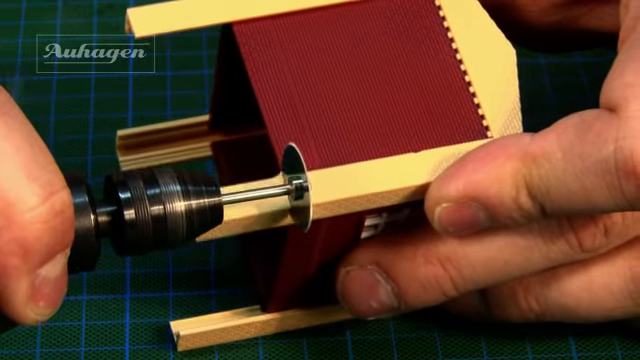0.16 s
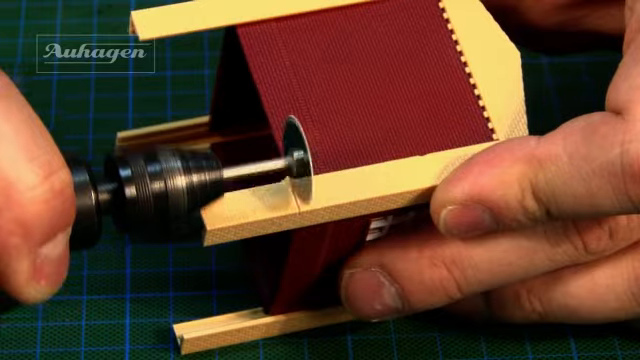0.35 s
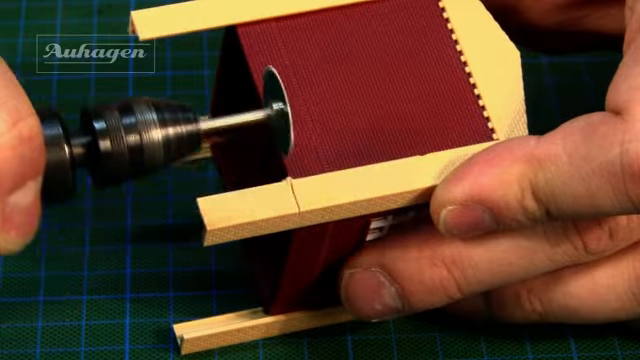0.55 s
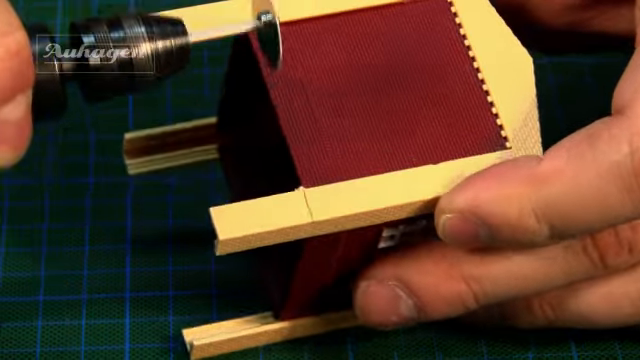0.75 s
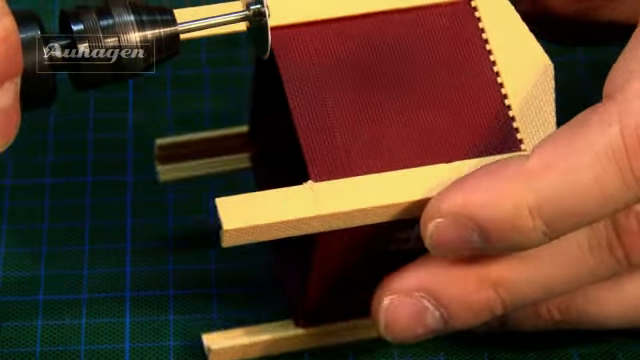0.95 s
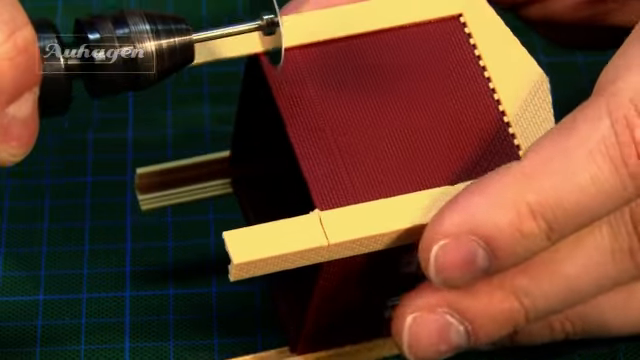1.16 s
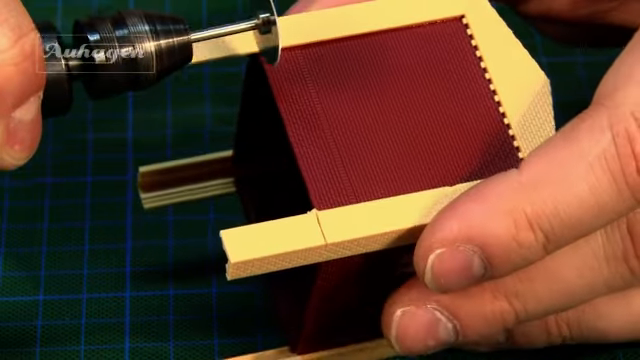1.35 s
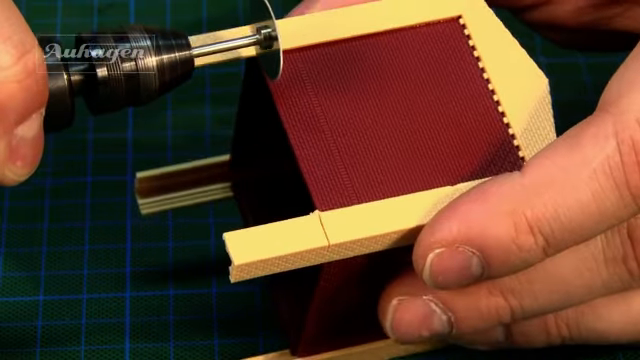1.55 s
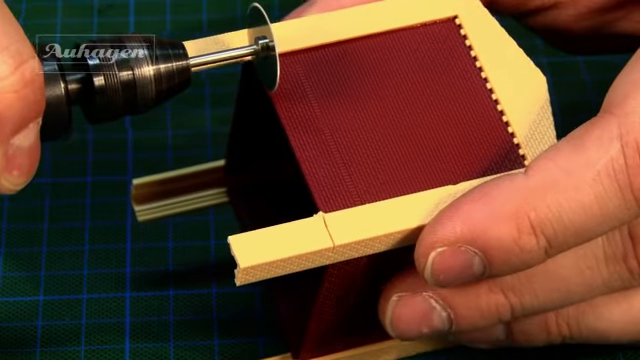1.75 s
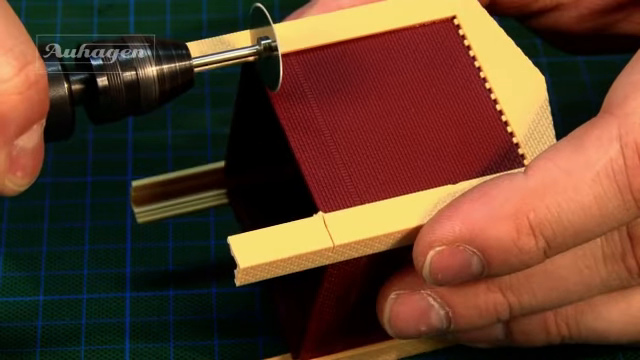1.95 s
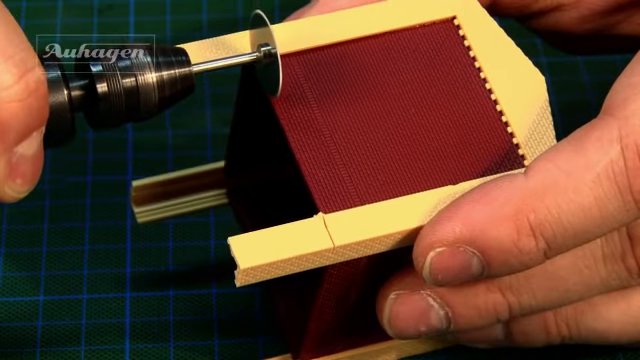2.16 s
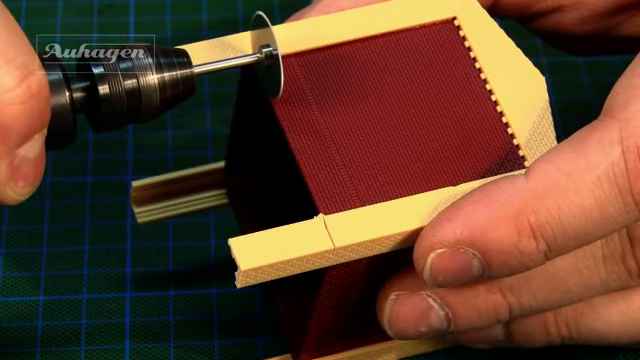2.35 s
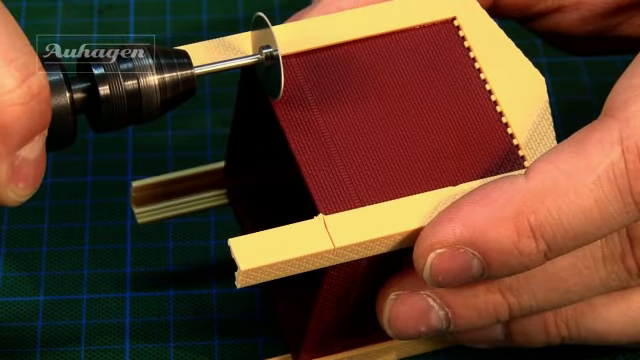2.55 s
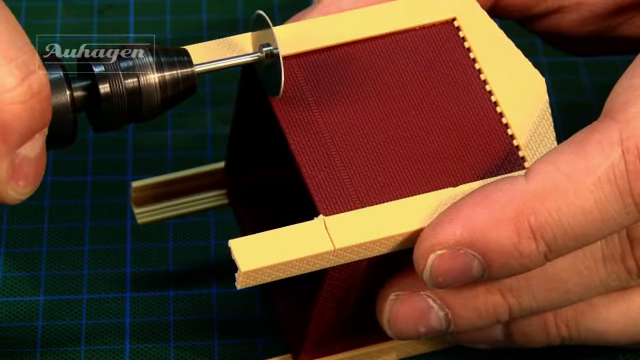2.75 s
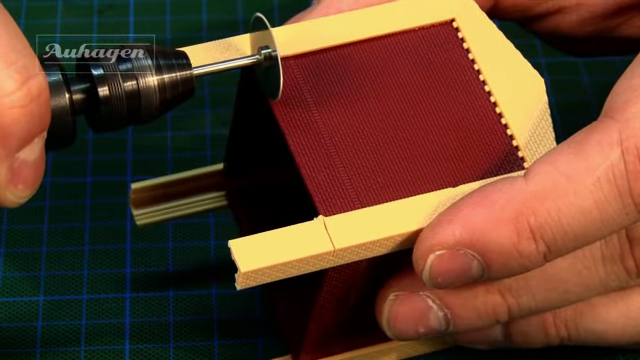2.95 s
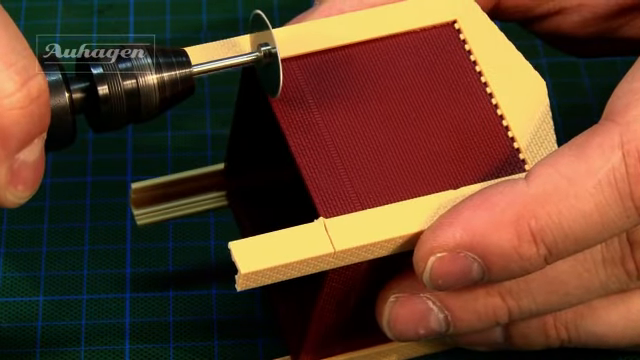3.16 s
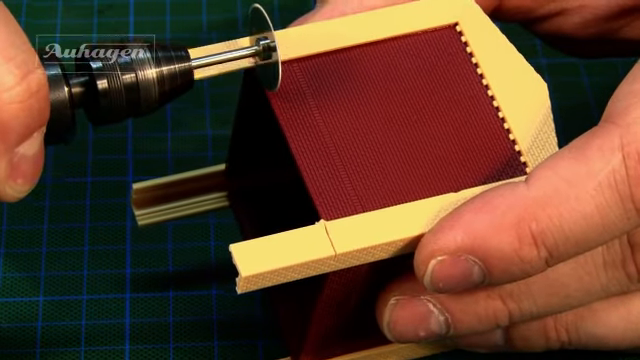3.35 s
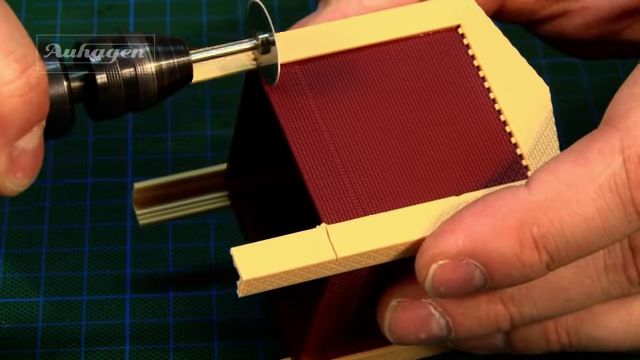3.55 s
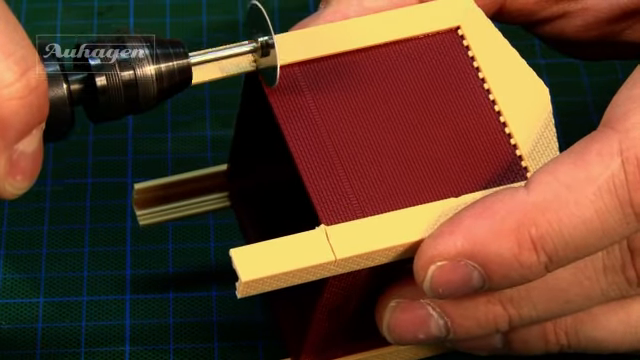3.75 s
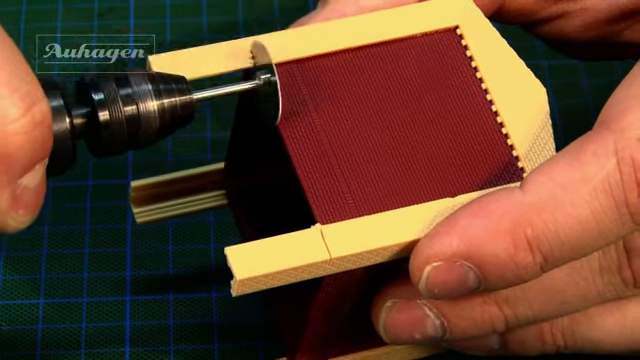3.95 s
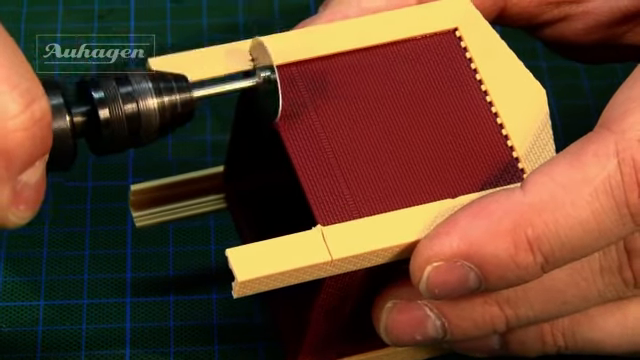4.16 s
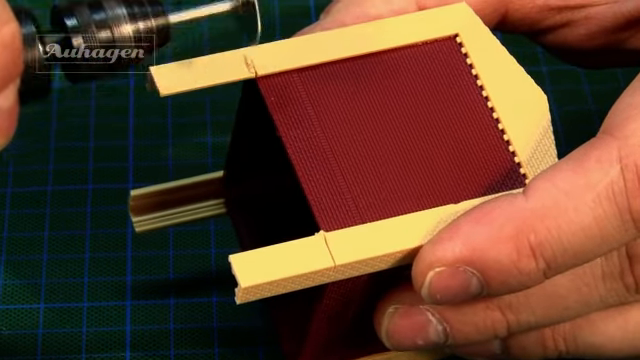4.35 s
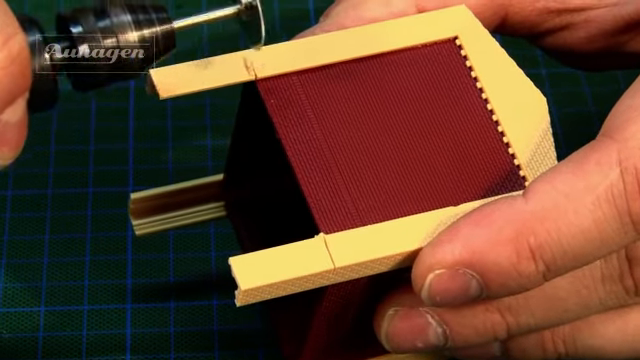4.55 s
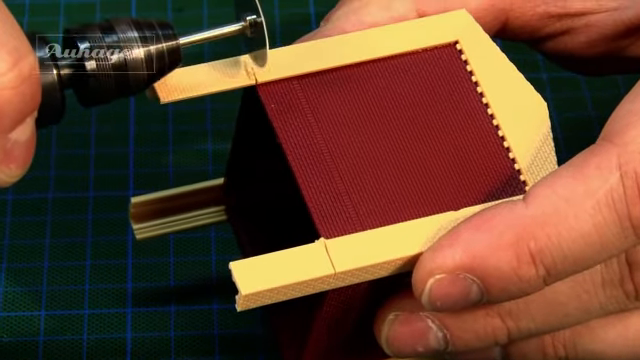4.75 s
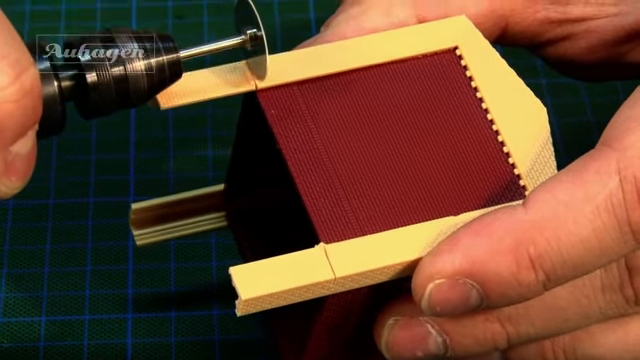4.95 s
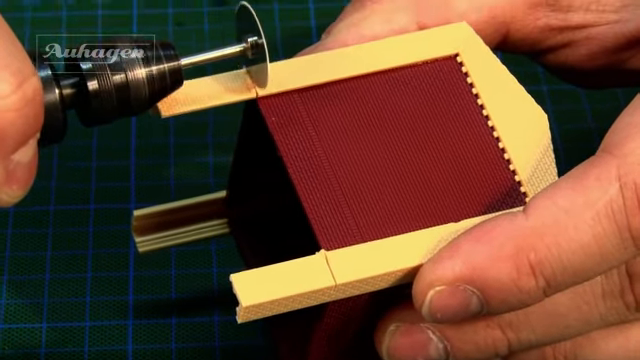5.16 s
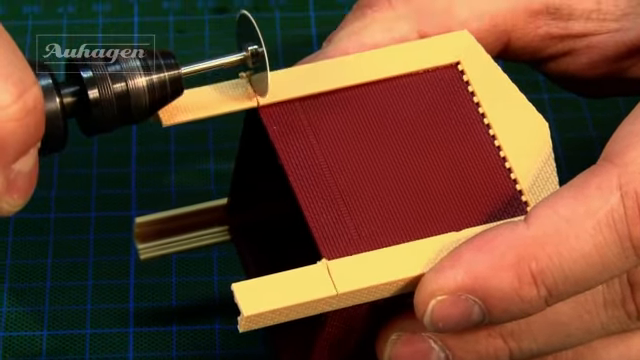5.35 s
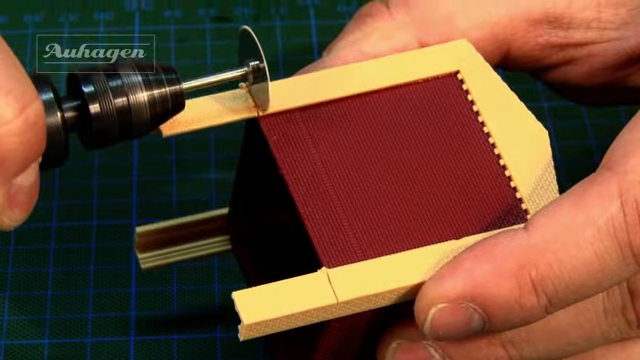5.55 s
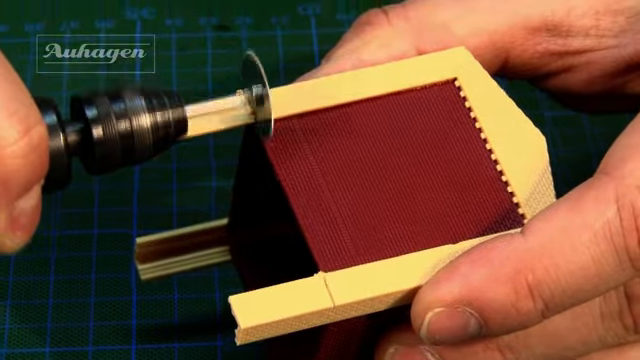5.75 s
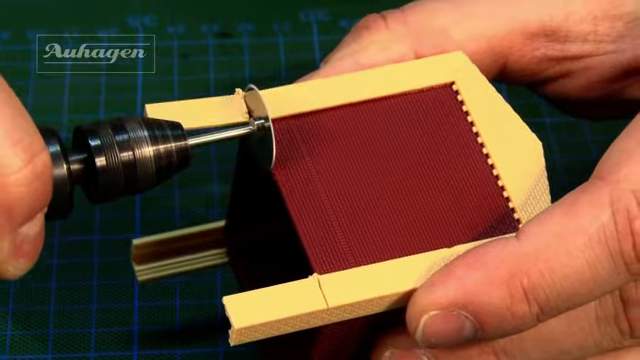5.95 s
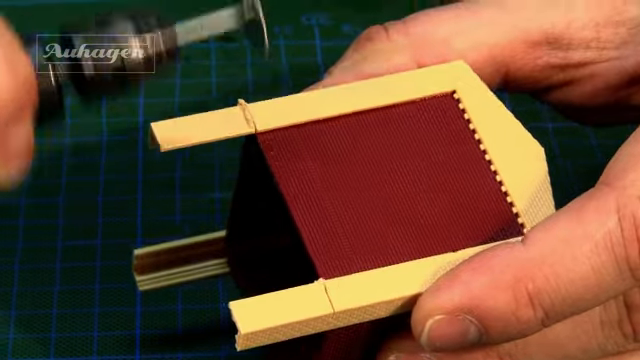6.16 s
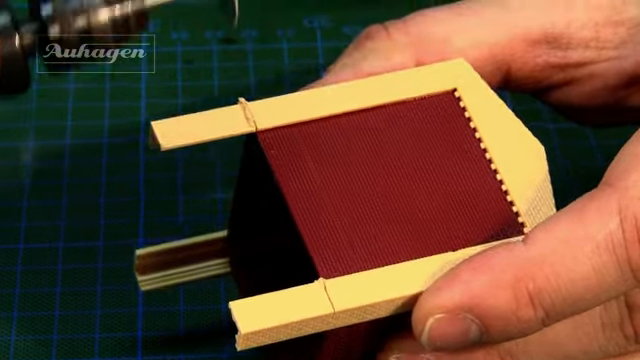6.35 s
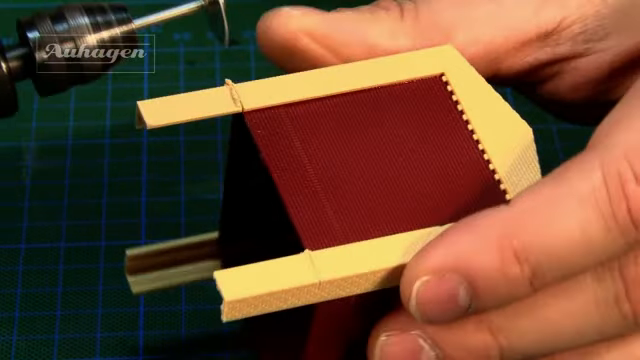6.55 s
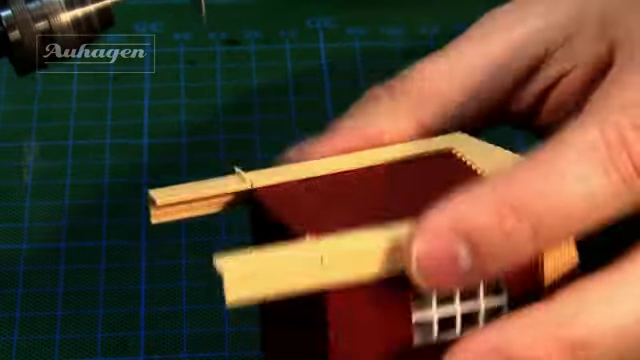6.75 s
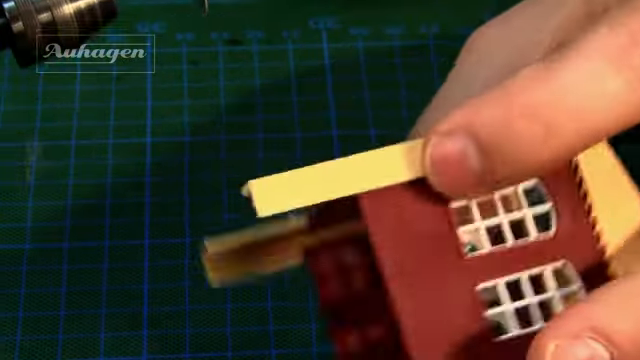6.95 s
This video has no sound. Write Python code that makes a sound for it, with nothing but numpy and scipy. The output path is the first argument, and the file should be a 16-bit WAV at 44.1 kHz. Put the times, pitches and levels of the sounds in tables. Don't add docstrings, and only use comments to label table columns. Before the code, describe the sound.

Close to the microphone in a small quiet room, a slowed cutting disc chatters on the edge of hollow plastic, then slips free and whines steadily. It saws in, buzzing and rasping as the pitch sags, jams with loud snags and squeals, and spins up again. A second cut binds into a clear thin whistle. The whine returns, and plastic taps the bench at the end.

```python
import sys
import numpy as np
from scipy import signal
from scipy.fft import rfft, irfft, next_fast_len
from scipy.io import wavfile
from scipy.ndimage import map_coordinates

SR = 44100
rng = np.random.default_rng(int(sys.argv[2]) if len(sys.argv) > 2 else 0)


def magnitude_from_level(level_db):
    exponent = np.asarray(level_db, float) / 20
    return 10 ** exponent


def unload_audio(sound):
    columns = np.transpose(np.atleast_2d(sound))
    steps = np.round(np.clip(columns, -1, 1) * 32767)
    wavfile.write(sys.argv[1], SR, steps.astype(np.int16))


N = 312669

# start_s, turns_hz
IDLE = [
    (1.05, 112.8),
    (1.5, 111.7),
    (2.35, 110.6),
    (4.9, 112.7),
    (6.5, 113.3),
    (7.09, 113),
]
SPIN_UP_S = .125
BALLS_PER_TURN, RIPPLE_HZ, TEETH = 8.3, 50.5, 59.6

# start_s, turns_hz, grip_db on the box, pressure_db of the rim
BOUNCING = [(0, 54.7, -59, -42), (.1, 55, -60, -41.5), (.16, 49.9, -64, -47.5), (.27, 46.6, -67, -61),
            (.29, 46.3, -71, -69), (.35, 50.5, -63.5, -52), (.4, 61, -74, -59)]
SLIDING_OUT = [
    (.42, 66.6, -72, -47.5),
    (.444, 73.6, -64, -42),
    (.48, 84, -77, -68),
]
SKIMMING = [
    (2.35, 110.7, -80, -84),
    (2.62, 111.1, -79.5, -53),
    (2.75, 108.7, -75, -47),
]
FIRST_SAWING = [(2.8, 109.3, -65.5, -42.5), (2.95, 107.4, -60.5, -40), (3.1, 104.2, -57, -37.5),
                (3.22, 101.3, -57, -41), (3.32, 98.5, -59, -40.5), (3.43, 98.7, -57, -42.5),
                (3.55, 94.54, -57, -41), (3.78, 91.97, -57, -41), (3.85, 86.6, -61, -40)]
FIRST_BINDING = [(3.9, 79.6, -45, -38), (3.94, 76.2, -50, -33.5), (3.952, 74.53, -52, -44),
                 (3.98, 73.24, -49, -36), (4.05, 67.74, -47, -36), (4.16, 61.48, -51.5, -41),
                 (4.23, 58.9, -45.5, -32.5), (4.275, 61.2, -39.5, -38), (4.33, 74.9, -69, -59)]
SECOND_SAWING = [(4.93, 112.3, -92, -64), (4.966, 111.8, -64.5, -54), (5.056, 106.1, -56.5, -46),
                 (5.17, 107.9, -54.5, -48), (5.28, 103.1, -57.5, -50.5), (5.35, 96.17, -59, -44),
                 (5.47, 94.43, -57.5, -45.5), (5.68, 82.65, -59, -43.5), (5.77, 79.27, -60.5, -43.5)]
SECOND_BINDING = [(5.846, 68.53, -49.5, -34.5), (5.894, 63.58, -49.5, -49.5), (5.922, 60.4, -47.5, -39),
                  (5.99, 57, -50, -45.5), (6.14, 52.66, -53.5, -57), (6.158, 53.28, -46.5, -44),
                  (6.175, 56.3, -45, -41.5), (6.2, 62.5, -61, -72)]
# thump_db over grip, tooth_db over pressure, bite sharpness, extra sharpness per dB of lighter touch
BOUNCE, SAW, BIND = (-3, -7, 1, 0), (2.5, -5, 0.7, 0.07), (-15, -8, 0.5, 0.08)
SLIDE = (-8, -22, .2, 0)
FIRM_DB = -38.5
FULL_LOAD_HZ = 28

# multiple, level_db, casing face (0 front, 1 and 2 sides)
WHINE = [(2, -65.5, 0), (3, -58, 0), (4, -55, 0), (5, -58, 1), (6, -55, 2), (7, -54.5, 1), (8, -55.5, 1),
         (9, -52, 1), (10, -59, 0), (11, -68, 0), (12, -62, 1), (13, -62, 0), (14, -65.5, 2),
         (15, -68.5, 2), (16, -76, 2)]
# pitch_hz, width_hz, level_db
CASING = [(2500, 490, 8), (3280, 200, 6), (4200, 430, 6), (5200, 280, 8), (6000, 250, 7), (6980, 190, 12),
          (8450, 400, 18), (11200, 400, 6)]
OFF_PEAK_DB = -1.5
# time_s, nearness_db, turned_db (side face towards the listener)
HAND = [(.45, -3.5, 5), (.62, -2, 0.5), (.8, 5.5, 0.5), (1.05, 1.5, 2.5), (1.25, -3, 3), (1.55, -2.5, 1.5),
        (1.85, 0, -3), (2.3, -0.5, -2), (2.7, 2, -5), (3.2, 2, -1), (3.8, -2, -3.5), (4.4, -2.5, 1),
        (4.9, -2.5, -2.5), (5.3, 1.5, -4.5), (5.75, 4.5, -3.5), (6.4, -1.5, -0.5), (6.8, -0.8, 8),
        (7.09, -1, 5.5)]
FRONT_DB, FRONT_FOLLOWS, FRONT_TURNS = -0.6, 0.3, -0.063
# multiple, start_s, end_s, gain_db
FINGERS = [(5, 0.84, 1.7, -2.5), (2, 1.06, 1.3, 3.5), (12, .75, 1.55, 3.5), (9, 1.2, 1.6, 3.5),
           (8, 1.2, 1.84, -2), (7, 1.14, 1.6, -1.5), (14, 1.8, 2.8, -6), (4, 1.92, 2.17, 4.5),
           (3, 2, 2.1, 3), (11, 1.8, 2.5, 4), (13, .75, 1.5, 3), (14, 4.6, 6.2, -8), (8, 6.65, 7.2, -5.5),
           (6, 6.5, 7.2, -6), (5, 6.8, 7.0, 3.5), (12, 6.5, 7.0, -5), (10, 6.6, 7.2, -4),
           (15, .75, 1.25, 2.5)]
FINGER_RAMP_S = 0.087
STALL_HZ, STALL_RANGE_HZ, STALL_DB, STALL_TOP_OVERTONE = 106, 36, -12, 13
# pitch_hz, level_db per Hz
BRUSH_HISS = [(710, -53), (1200, -28), (1680, -53), (2150, -7.5), (2560, -9.5), (2790, -4), (4130, -5),
              (7000, -4), (8800, -8.5), (14400, -22.5), (15300, -16), (16000, -62)]
HISS_DB, HISS_FOLLOWS, LOAD_HISS_DB = -51.5, 0.19, 10

# pitch_hz, width_hz, level_db
HOLLOW = [(405.6, 86, 5.5), (618, 185, -1)]
# pitch_hz, width_hz, level_db
WALLS = [(1248, 34, 11), (840, 340, -3), (1540, 200, -4.5), (2180, 400, -21), (2900, 110, 0.5)]
# pitch_hz, width_hz, level_db
SCRAPE = [(1330, 290, -21), (2196, 470, -3), (2947, 130, -1), (4000, 760, -2.5), (5590, 1050, -1),
          (8400, 2260, -5.5)]
# start_s, end_s, gain_db
SINGING = [(2.75, 3.1, -3), (4.97, 5.19, -1), (5.331, 5.47, -5), (3.3, 3.461, 1), (3.502, 3.8, -1.5),
           (3.871, 3.952, 3), (4.016, 4.1, 4), (5.19, 5.324, 6.5), (5.481, 5.583, 4.5), (5.63, 5.79, -3),
           (5.791, 5.884, 5.5)]
SING_RAMP_S = 0.021

# start_s, end_s, pitch_hz, width_hz, level_db
CHATTER = [
    (3.868, 3.94, 2340, 169, -42.5),
    (3.964, 4.0, 2310, 200, -46),
]
RASP = [(.004, .175, 3080, 100, -50), (2.76, 2.95, 4400, 70.5, -50.5), (2.72, 2.78, 1176, 129.8, -51.5),
        (3.987, 4.16, 14200, 240, -41.5), (3.745, 3.84, 5380, 93.3, -42.5),
        (3.895, 3.945, 4380, 250.1, -43), (3.9, 3.945, 8530, 290, -45), (3.964, 4.13, 4200, 276, -39.5),
        (3.987, 4.225, 9470, 559.6, -36), (4.04, 4.25, 5350, 214.5, -42.5),
        (4.252, 4.263, 3058, 199.9, -35), (5.8, 5.88, 2178, 143.8, -45.5), (5.915, 5.945, 5200, 191, -37),
        (5.915, 5.95, 9214, 149.9, -38)]
SQUEAL = [(3.45, 3.8, 5810, 59, -56), (3.968, 3.995, 1261, 59, -41), (4.038, 4.15, 1261, 61, -44),
          (4.19, 4.23, 1261, 65.4, -52), (1.2, 1.9, 5600, 40, -64), (3.62, 3.8, 4744, 92, -53),
          (3.35, 3.43, 4850, 80, -52), (3.6, 3.76, 2150, 107.1, -53), (4.11, 4.243, 4780, 163, -34.5),
          (4.165, 4.228, 9520, 400, -38), (4.228, 4.25, 9600, 401, -38), (4.168, 4.245, 14200, 250, -35),
          (4.247, 4.283, 1400, 90, -45), (4.299, 4.308, 3950, 220, -47), (4.305, 4.316, 1250, 90, -53),
          (5.908, 5.95, 10080, 580, -39.5), (5.907, 6.17, 11930, 5600, -51.5),
          (5.945, 6.15, 14600, 70, -48), (5.912, 5.945, 14460, 120, -40), (5.915, 5.945, 8200, 120, -44),
          (5.915, 5.945, 13300, 118, -50), (5.922, 5.935, 10140, 150, -39), (5.95, 6.15, 10390, 90, -56),
          (5.95, 6.16, 8070, 200, -56), (6.148, 6.165, 14000, 400, -47), (5.907, 6.17, 15200, 900, -54),
          (3.97, 4.3, 14000, 900, -54), (5.07, 5.28, 7080, 90, -52), (5.33, 5.51, 7080, 79, -55),
          (5.58, 5.79, 6300, 120, -62), (3.0, 3.07, 7700, 120, -53), (3.1, 3.17, 6800, 130, -47),
          (4.245, 4.285, 1870, 1440, -49), (3.46, 3.62, 4744, 54.3, -46.5)]
MORE_SQUEALS = [(2.88, 3.08, 1230, 60, -63.5), (3.11, 3.17, 1240, 35, -58), (3.19, 3.33, 1230, 46, -57.5),
                (3.42, 3.56, 1240, 49.74, -56), (5.2, 5.29, 1240, 45, -57), (5.35, 5.48, 1235, 40, -68),
                (3.13, 3.2, 2150, 84.4, -52), (3.02, 3.1, 4320, 110, -50), (0.86, 1.16, 3900, 130, -60),
                (6.69, 6.9, 3600, 150, -61), (3.56, 3.83, 6900, 90, -55), (3.74, 3.87, 5100, 90, -53),
                (2.97, 3.09, 5300, 130, -46.5), (5.85, 5.9, 1240, 61.7, -54)]
WHISTLE = [
    (5.948, 6.148, 9206, 25, -30.5),
    (6.14, 6.158, 9140, 60, -40),
    (6.153, 6.163, 4950, 237, -39),
    (6.152, 6.168, 9960, 300.4, -43),
]
CHATTER_THROB, RASP_THROB, SQUEAL_THROB, WHISTLE_THROB = 2.5, 0.89, 0.13, 0.14
RING_FADE_DB_PER_S = 5

# start_s, end_s, pitch_hz, width_hz, level_db
KNOCKS = [(2.77, 2.9, 6000, 561, -48.5), (2.92, 3.08, 5600, 900, -46.5), (2.77, 3.0, 3950, 648.1, -51),
          (5.06, 5.2, 4290, 500, -55), (5.24, 5.38, 11200, 463, -61), (3.077, 3.258, 6000, 416.7, -48),
          (3.316, 3.45, 5670, 648.1, -41.5), (3.459, 3.75, 5540, 489.8, -50.5),
          (2.784, 2.968, 2250, 380, -51), (2.899, 3.2, 2800, 600, -50), (2.979, 3.1, 2200, 450, -62),
          (3.217, 3.307, 2400, 790, -52), (3.298, 3.518, 2900, 597, -46), (3.304, 3.4, 2400, 500, -47),
          (3.453, 3.56, 2500, 757.6, -53), (5.04, 5.21, 2820, 800, -48.5), (5.33, 5.47, 2700, 555.6, -54),
          (5.63, 5.79, 2766, 556, -52.5)]
# time_s, peak_db
BOUNCES = [(0.0014, -26), (0.0177, -26), (0.0357, -27), (0.0541, -23), (0.0729, -23), (0.092, -27),
           (0.1086, -28), (0.127, -28), (0.1473, -30), (0.1689, -27), (0.19, -27), (0.2103, -26.5),
           (0.2308, -26.5), (0.2495, -31), (0.2707, -30), (0.2941, -32), (0.3141, -37), (0.3315, -29.5),
           (0.352, -37), (0.369, -35)]
# pitch_hz, width_hz, level_db
BOUNCE_RING = [(3190, 250, 1), (4170, 690, 2), (4900, 750, -8.5), (6350, 500, -16), (9130, 400, -7),
               (12000, 3000, -16), (168, 85, -10)]
# time_s, peak_db, pitch_hz
SNAGS = [(3.8935, -31, 4430), (3.9053, -26, 4530), (3.9178, -24, 4340), (3.937, -21, 4170),
         (3.9593, -23, 5340), (3.9721, -17.5, 5390), (3.9833, -13.5, 5290), (3.9962, -21, 5300),
         (4.0091, -19.5, 5313), (4.0307, -23, 5300), (4.0942, -22.5, 5200), (4.119, -20, 5383),
         (4.149, -24, 5293), (4.1636, -23, 5200), (4.2142, -20.5, 4680), (4.307, -32, 3940),
         (5.7857, -34, 4640), (5.8003, -30, 4397), (5.8139, -25, 4400), (5.827, -30, 4248),
         (5.8425, -29, 4050), (5.8601, -28, 3900), (5.874, -32, 4000), (5.9055, -23, 4950),
         (5.9254, -19.5, 5130), (6.156, -20, 4930)]
# time_s, peak_db
SLAPS = [(4.2455, -25.5), (4.2623, -25), (4.278, -30), (5.915, -25), (5.931, -27), (5.948, -27.5),
         (5.965, -40), (5.982, -36), (6.002, -31), (6.022, -32), (6.082, -48), (6.102, -39), (6.123, -36.5)]
# pitch_hz, width_hz, level_db
SLAP_RING = [(1240, 68, 5), (2900, 290, -9), (3620, 540, -9.5)]

# time_s, peak_db, pitch_hz, contact_ms
TAPS = [(0.413, -51, 1590, 9), (0.443, -44, 1270, 8.2), (2.373, -62, 1436, 9.2), (2.47, -66, 1440, 40),
        (2.58, -66, 1400, 40), (2.722, -55, 1210, 9), (6.779, -33.5, 1000, 1.6), (6.786, -47.5, 1200, 9),
        (6.845, -53, 701, 19), (6.88, -53, 999, 7.7), (6.893, -45.5, 950, 4)]
TAP_CUT_HZ = 1750
# start_s, end_s, first_db, last_db
SHAKES = [
    (-.2, 0.452, -48, -61.5),
    (3.146, 3.994, -63.5, -60.5),
    (5.053, 5.902, -60.5, -65.5),
    (6.72, 6.948, -65, -60),
]
SHAKE_RAMP_S, IDLE_SHAKE_DB = 0.1, -84.5

# pitch_hz, level_db per Hz
ROOM = [(15, -36), (25, -14), (141, -1.5), (174, -13), (291, -8), (393, -12), (429, -0.5), (512, -11),
        (728, -1.5), (933, -12), (1700, -10), (2210, -55), (3740, -120)]
ROOM_DB = -71.5
# pitch_hz, level_db
HUM = [
    (48.4, -83.5),
    (102.3, -84),
    (150.7, -89),
]
TAIL_T60_S, TAIL_DB, TAIL_CUT_HZ = 0.23, -14, 3200
TOP_HZ = 16300


def rms_one(x):
    return x / np.sqrt(np.mean(np.abs(x) ** 2) + 1e-20)


def in_time(rows):
    s, *columns = np.transpose(rows)
    return [np.interp(np.arange(N) / SR, s, c) for c in columns]


def ramped(t, start, end, ramp):
    return np.clip(np.minimum(t - start, end - t) / ramp, 0, 1)


def drift(rate):
    r = np.exp(-128 * np.pi * rate / SR)
    slow = signal.lfilter([1], [1, -2 * r, r * r], rng.standard_normal(N // 64 + 1502))[1500:]
    return np.interp(np.arange(N) / 64, np.arange(len(slow)), rms_one(slow))


def resonate(x, modes):
    out = 0
    for k, (hz, width, db) in enumerate(modes):
        r = np.exp(-np.pi * max(width, 4) / SR)
        poles = [1, -2 * r * np.cos(2 * np.pi * hz / SR), r * r]
        ring = signal.lfilter([(1 - r * r) / 2, 0, (r * r - 1) / 2], poles, x + 1e-18)
        out = out + (-1) ** k * magnitude_from_level(db) * ring
    return out


def high_pass(x, hz):
    return signal.sosfilt(signal.butter(3, hz, "high", fs=SR, output="sos"), x)


def coloured(spectrum):
    size = next_fast_len(N)
    hz, db = np.transpose(spectrum)
    gain = magnitude_from_level(np.interp(np.log(np.fft.rfftfreq(size, 1 / SR) + 1), np.log(hz), db))
    return rms_one(irfft(rfft(rng.standard_normal(size)) * gain, size)[:N])


def once_a_turn(turns, rough_db):
    passed = np.diff(np.floor(turns), prepend=np.floor(turns[0]))
    return passed * magnitude_from_level(rough_db * rng.standard_normal(N))


def bite(turns, sharpness):
    even_power = (1 + 17.9 * sharpness ** 2 / (1 + sharpness)) ** 0.31
    return np.exp(sharpness * (np.cos(2 * np.pi * turns) - 1)) * even_power


def rim(turns, lasts):
    around = 700
    worn = (turns - turns[0]) / lasts
    shapes = rng.standard_normal((int(worn[-1]) + 2, around + 1))
    return rms_one(map_coordinates(shapes, [worn, turns % 1 * around], order=1))


def contact():
    t = np.arange(N) / SR
    idle, = in_time(IDLE)
    lost, touching, rows = np.zeros(N), np.zeros(N), []
    spells = [[(BOUNCING, BOUNCE), (SLIDING_OUT, SLIDE)],
              [(SKIMMING, SAW), (FIRST_SAWING, SAW), (FIRST_BINDING, BIND)],
              [(SECOND_SAWING, SAW), (SECOND_BINDING, BIND)]]
    for spell in spells:
        mine = []
        for phase, (thump_db, tooth_db, sharp, sharper) in spell:
            for s, hz, grip, press in phase:
                sharpness = sharp + sharper * (FIRM_DB - press)
                mine.append((s, hz, grip + thump_db, grip, press, press + tooth_db, sharpness))
        start, end = mine[0][0], mine[-1][0]
        already = start < .1
        held = (idle - in_time(mine)[0]) * np.exp(-np.maximum(t - end, 0) / SPIN_UP_S)
        lost = np.where((t >= start) | already, held, lost)
        touching += ramped(t, start - already, end, .015)
        rows += mine
    return idle - lost, lost, touching, in_time(rows)[1:]


def motor(turns, speed, load):
    near_db, turned_db = in_time(HAND)
    front_db = FRONT_DB + FRONT_FOLLOWS * near_db + FRONT_TURNS * turned_db
    faces_db = [front_db, near_db + turned_db, near_db - turned_db]
    slowed = np.clip((STALL_HZ - speed) / STALL_RANGE_HZ, 0, 1)
    ripple = 2 * np.pi * RIPPLE_HZ * np.arange(N) / SR
    sides = [(np.exp(1j * m * ripple[::8]), magnitude_from_level(db))
             for m, db in zip(np.arange(-4, 3, 2), [-19.0, -2.5, 2.5, -2.5])]
    ball = 2 * np.pi * BALLS_PER_TURN * turns + 0.076 * drift(20.5) + 0.43 * drift(3.2)
    t = np.arange(N)[::64] / SR
    whine = 0
    for n, db, face in WHINE:
        split = 0
        for side, gain in sides:
            split = split + side * gain * magnitude_from_level(3.3 * drift(13)[::8]) * np.exp(2j * np.pi * rng.random())
        split = np.interp(np.arange(N) / 8, np.arange(len(split)), split)
        pitch = n * BALLS_PER_TURN * speed[::64]
        peaks_db = sum(peak * np.exp(-((pitch - hz) / width) ** 2) for hz, width, peak in CASING)
        casing_db = np.sqrt(slowed) * (OFF_PEAK_DB + peaks_db.repeat(64)[:N])
        stall_db = STALL_DB * slowed * np.clip((STALL_TOP_OVERTONE - n) / 7, .5, 1.5)
        held_db = 0 * t
        for m, start, end, gain_db in FINGERS:
            if round(m) == n:
                held_db = held_db + gain_db * ramped(t, start, end, FINGER_RAMP_S)
        unsteady_db = np.sqrt(slowed) * (3 - 7 * np.abs(drift(12.0)))
        level_db = db + faces_db[round(face)] + stall_db + casing_db + held_db.repeat(64)[:N] + unsteady_db
        whine = whine + magnitude_from_level(level_db - 4.0) * np.real(split * np.exp(1j * n * ball))
    hiss = coloured(BRUSH_HISS) * (1 + .3 * np.cos(2 * ripple)) * magnitude_from_level(.8 * drift(14))
    clicks = once_a_turn(turns, rough_db=1.2)
    wobble = resonate(clicks, [(2132.0, 103, 2.0), (564, 180, -14.5), (1125, 79, -19.5)])
    hiss_db = HISS_DB + HISS_FOLLOWS * near_db + LOAD_HISS_DB * load
    return high_pass(whine, hz=1840) + magnitude_from_level(hiss_db) * (hiss + magnitude_from_level(-15.5) * rms_one(wobble))


def singing():
    t = np.arange(N) / SR
    return sum(db * ramped(t, start, end, SING_RAMP_S) for start, end, db in SINGING)


def cutting(turns, touching, thump_db, rattle_db, scrape_db, tooth_db, sharpness):
    thump = resonate(once_a_turn(turns, rough_db=1.03), HOLLOW)
    thump = rms_one(high_pass(high_pass(thump, hz=248), hz=243))
    rattle = rms_one(resonate(once_a_turn(turns - .05, rough_db=2.0), WALLS))
    grumble = rms_one(resonate(rng.standard_normal(N), [(486, 92, -0.29), (890, 540, -0.71)]))
    binding = np.clip((88 - np.gradient(turns) * SR) / 18, .1, 1.4)
    edge = rim(turns, lasts=11.)
    loose = rms_one(resonate(edge, WALLS))
    chips = edge + 0.11 * rng.standard_normal(N) * magnitude_from_level(1.0 * drift(67))
    tooth = 2 * np.pi * TEETH * turns + 1.32 * (1 + binding) * drift(160)
    teeth = (np.cos(tooth) + magnitude_from_level(-8.0) * np.cos(2 * tooth)) * magnitude_from_level(2.0 * drift(26))
    pressure = bite(turns, np.clip(sharpness, 0, 12))
    torn = touching * chips * pressure * magnitude_from_level(scrape_db + 5.0)
    dust = touching * chips * pressure ** 0.57 * magnitude_from_level(scrape_db - 7.5 - 3.5 * binding)
    box = magnitude_from_level(thump_db) * (thump + binding * grumble)
    walls = magnitude_from_level(rattle_db) * (0.76 * rattle + 0.45 * loose * pressure)
    tooth_tone = magnitude_from_level(tooth_db + singing()) * teeth * pressure
    return touching * (box + walls + tooth_tone) + resonate(torn, SCRAPE) + resonate(dust, [(12600, 14000, 0)])


def squeals(turns):
    out = np.zeros(N)
    uneven = drift(25.0)
    waver = 0.73 * np.sin(2 * np.pi * turns) + 0.79 * drift(40.0)
    kinds = [(CHATTER, CHATTER_THROB), (RASP, RASP_THROB), (SQUEAL, SQUEAL_THROB),
             (MORE_SQUEALS, SQUEAL_THROB), (WHISTLE, WHISTLE_THROB)]
    for rows, throb in kinds:
        for start, end, hz, width, db in rows:
            a, b = round((start - .003) * SR), round((end + 0.0033) * SR)
            t = np.arange(a, b) / SR
            clear = width < 30
            noise = rng.standard_normal(b - a + 4000)
            tone = resonate(resonate(noise, [(hz, width, 0)]), [(hz, 2 * width, 0)])
            tone = signal.hilbert(tone)[4000:] * np.exp(1j * waver[a:b] * clear)
            tone = rms_one(np.real(tone / np.abs(tone) ** (.97 if clear else .88)))
            edges = np.clip((t - t[0]) / .003, 0, 1) * np.clip((t[-1] - t) / .008, 0, 1)
            since = turns[a:b] - turns[round(start * SR)]
            swell = bite(since + 0.11 * uneven[a:b], throb) * magnitude_from_level(1.05 * throb * uneven[::-1][a:b])
            out[a:b] += magnitude_from_level(db - RING_FADE_DB_PER_S * (t - t.mean())) * tone * edges * swell
    return out


def knocks(turns):
    out = np.zeros(N)
    grains = rms_one(once_a_turn(turns, rough_db=1.0)) + 0.12 * rim(turns, lasts=29.8) * bite(turns, 5.6)
    for start, end, hz, width, db in KNOCKS:
        a, b = round(start * SR), round(end * SR)
        edges = ramped(np.arange(b - a), 0, b - a - 1, .03 * SR)
        ring = resonate(resonate(grains[a:b], [(hz, width, 0)]), [(hz, 2 * width, 0)])
        out[a:b] += magnitude_from_level(db) * edges * rms_one(ring)
    return out


def blows(rows, rise_s, fall_s, trim_db):
    out, t = np.zeros(N + SR), np.arange(SR // 20) / SR
    swell = (1 - np.exp(-(t / rise_s) ** 2)) * np.exp(-t / fall_s)
    for s, db, modes in rows:
        grains = swell * rng.standard_normal(len(t))
        ring = sum(resonate(resonate(grains, [mode]), [(mode[0], 3 * mode[1], 0)]) for mode in modes)
        out[round(s * SR) + np.arange(len(t))] += magnitude_from_level(db + trim_db) * ring / np.max(np.abs(ring))
    return out[:N]


def catches():
    landings = [(max(s - .003, 0), db, BOUNCE_RING) for s, db in BOUNCES]
    clacks = [(s + 0.00102, db, [(2200, 170, 0)]) for s, db in BOUNCES]
    snags = [(s - .003, db, [(hz, 200, 0)]) for s, db, hz in SNAGS]
    slaps = [(s, db, SLAP_RING) for s, db in SLAPS]
    return (blows(landings, rise_s=0.0058, fall_s=.0021, trim_db=-1.0)
            + blows(clacks, rise_s=0.0034, fall_s=0.0019, trim_db=-11.0)
            + blows(snags, rise_s=0.0042, fall_s=0.0019, trim_db=-1.0)
            + blows(slaps, rise_s=0.00046, fall_s=0.00097, trim_db=-2.5))


def taps():
    out, t = 0, np.arange(2000) / SR
    for s, db, hz, contact_ms in TAPS:
        burst = np.zeros(N)
        burst[round(s * SR) + np.arange(2000)] = rng.standard_normal(2000) * np.exp(-t * 1000 / contact_ms)
        knock = resonate(burst, [(hz, 260, 0), (450, 220, -4), (1500, 350, -5), (330, 150, -16)])
        knock = signal.sosfilt(signal.butter(4, TAP_CUT_HZ, fs=SR, output="sos"), knock)
        out = out + magnitude_from_level(db) * knock / np.max(np.abs(knock))
    return out


def shake(turns):
    rumble = rms_one(resonate(rng.standard_normal(N), [(55, 76, -13), (122, 89, 5.0)]))
    angle = 2 * np.pi * turns
    throb = np.sin(angle) + 0.42 * np.sin(2 * angle) + 0.15 * np.sin(3 * angle)
    t, size = np.arange(N) / SR, magnitude_from_level(IDLE_SHAKE_DB)
    for start, end, first_db, last_db in SHAKES:
        level = magnitude_from_level(np.interp(t, [start, end], [first_db, last_db]))
        size = size + ramped(t, start, end, SHAKE_RAMP_S) ** 2 * level
    return size * magnitude_from_level(-5.5) * (throb + 0.2 * rumble)


def room_tail(x):
    t = np.arange(SR // 2) / SR
    decay = rng.standard_normal(len(t)) * magnitude_from_level(-60 * t / TAIL_T60_S) * (t > .015)
    decay = signal.sosfilt(signal.butter(1, TAIL_CUT_HZ, fs=SR, output="sos"), decay)
    decay = decay / np.sqrt(np.sum(decay ** 2) * SR / 4 / TAIL_CUT_HZ)
    return magnitude_from_level(TAIL_DB) * signal.fftconvolve(x, decay)[:N]


def room_tone():
    t = np.arange(N) / SR
    hum = sum(magnitude_from_level(db + 3.5 + 2.3 * drift(1.7)) * np.sin(2 * np.pi * hz * t) for hz, db in HUM)
    return magnitude_from_level(ROOM_DB) * coloured(ROOM) + hum


def scene():
    speed, lost, touching, layers = contact()
    turns = np.cumsum(speed) / SR - .17
    scrape_db = layers[2]
    firmness = np.clip(0.5 + (scrape_db - FIRM_DB) / 20, 0, 1)
    load = touching * np.clip(lost / FULL_LOAD_HZ, 0, 1) * firmness
    near = motor(turns, speed, load) + cutting(turns, touching, *layers) + squeals(turns)
    near = near + knocks(turns) + catches() + taps() + shake(turns)
    heard = near.copy()
    for delay_s, db in [(.0043, -18), (.0091, -21), (.0167, -26)]:
        delay = round(delay_s * SR)
        heard[delay:] += magnitude_from_level(db) * near[:-delay]
    return np.tile(heard + room_tail(near) + room_tone(), (2, 1))


def band_limit(x):
    return signal.sosfilt(signal.butter(12, 16310, fs=SR, output="sos"), x)


def record(dry):
    mix = signal.sosfilt(signal.cheby2(10, 50, TOP_HZ, fs=SR, output="sos"), dry)
    return band_limit(mix)


dry = scene()
out = record(dry)
unload_audio(out)
```